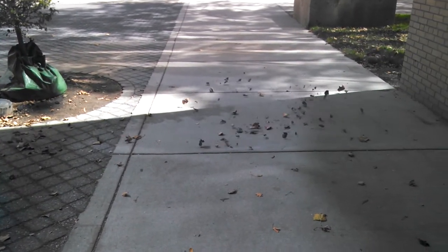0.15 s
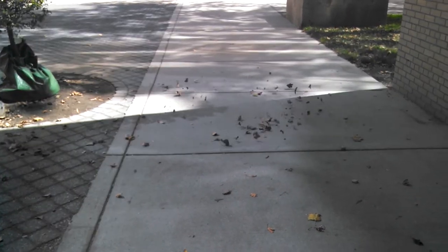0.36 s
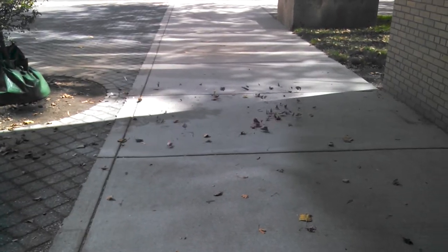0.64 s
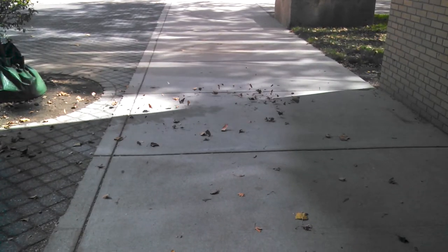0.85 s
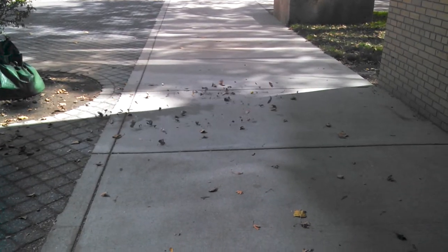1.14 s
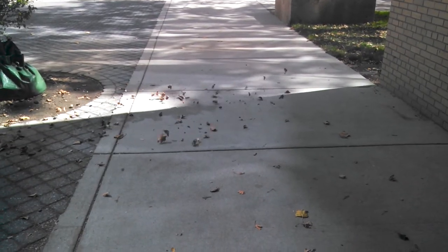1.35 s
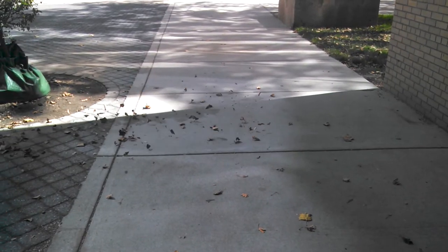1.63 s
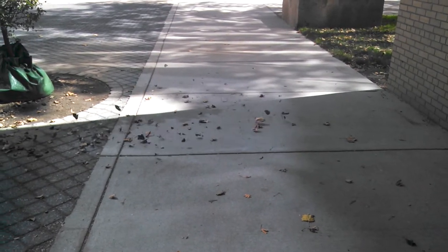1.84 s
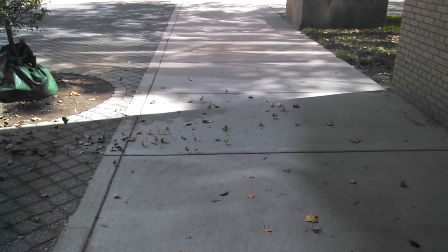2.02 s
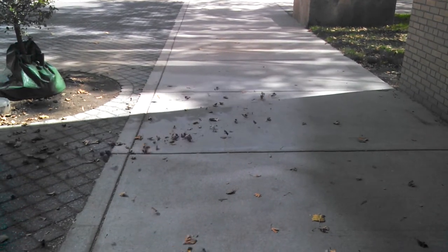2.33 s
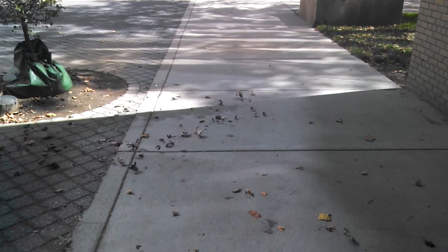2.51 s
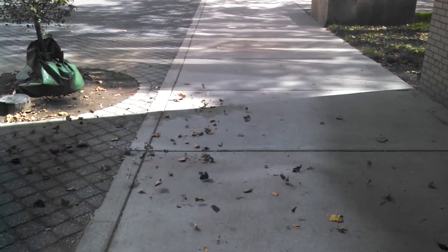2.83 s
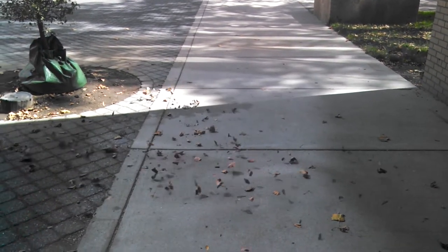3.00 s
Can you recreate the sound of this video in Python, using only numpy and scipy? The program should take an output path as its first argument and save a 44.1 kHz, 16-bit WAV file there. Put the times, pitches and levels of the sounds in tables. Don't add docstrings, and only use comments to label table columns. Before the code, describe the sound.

A swarm of dry leaves scrapes and taps across concrete outdoors, close to a small stereo camera microphone; low wind buffets grow strong around two seconds and return near the end, over distant murmur and humming fans.

```python
import sys
import numpy as np
from scipy import signal
from scipy.fft import rfft, irfft
from scipy.io import wavfile
from scipy.ndimage import uniform_filter1d

SR = 44100
rng = np.random.default_rng(int(sys.argv[2]) if len(sys.argv) > 2 else 0)


def ratio_of_db(decibels):
    return 10 ** (np.asarray(decibels, float) / 20)


def wav_out(sig):
    wavfile.write(sys.argv[1], SR, np.round(np.clip(np.atleast_2d(sig).T, -1, 1) * 32767).astype(np.int16))


N = 139797

# pitch_hz, level_db (per Hz)
LEAF_SPECTRUM = [(900, -15.5), (2000, 0), (3000, -1), (4400, -1), (6500, -3), (8500, -6.5), (9800, -17.5),
                 (12000, -14)]


def table(rows, at):
    rows = np.array(rows, float)
    return np.interp(np.log(np.maximum(at, 1)), np.log(rows[:, 0]), rows[:, 1])


def curve(rows, t):
    times, levels = np.transpose(rows)
    return np.interp(t, times, levels)


def unit(x):
    return x / np.sqrt(np.mean(x ** 2))


def colour(x, rows):
    return irfft(rfft(x) * ratio_of_db(table(rows, np.fft.rfftfreq(N, 1 / SR))), N)


def band(x, hz, width, order=1):
    half = width / hz / 2
    edge = hz * (np.sqrt(1 + half ** 2) + np.array([-1, 1]) * half)
    sos = signal.butter(order, np.minimum(edge, SR / 2.2), "band", fs=SR, output="sos")
    return signal.sosfilt(sos, x)


def walk(rate):
    k = int(SR / rate)
    steps = np.repeat(rng.standard_normal(N // k + 1), k)
    return 0.88 * uniform_filter1d(uniform_filter1d(steps, k), k)[:N]


def far_port(db):
    return ratio_of_db(np.array([[0], [db]]))


def ports(pair):
    return np.array([pair[0] + pair[1], pair[0] - pair[1]]) / 2


def town_murmur():
    # pitch_hz, level_db (per Hz)
    murmur = [(40, -9.5), (100, 1.5), (300, 1), (520, -11.5), (950, -14), (1500, -25), (3000, -34.5),
              (9000, -54)]
    # pitch_hz, difference_over_sum_db
    apart = [(60, 9), (200, -26), (400, -8), (700, -6.5), (1100, 3), (1600, 3.5)]
    pair = colour(rng.standard_normal((2, N)), murmur)
    pair[1] = colour(pair[1], apart)
    pair = pair / np.std(pair[0])
    swell, out = walk(4.8), 0
    for hz in 40 * 2 ** np.arange(0, 8, 1 / 2):
        flicker_db = 0.6 * swell + 2.9 * walk(11.93)
        out = out + ratio_of_db(flicker_db) * band(pair, hz, hz / 3)
    return ports(out * ratio_of_db(-20.5))


def fan_plant(t):
    # pitch_hz, width_hz, level_db
    partials = [(297.6, 5.14, -19), (361.2, 12.7, -29), (596.7, 12, -31.5), (640, 34, -35.5),
                (887.5, 15, -42.5), (995, 136, -36)]
    # time_s, level_db
    carry = [(0, 3.5), (.11, 1.5), (.15, -2), (.2, 0), (.43, -1.5), (.5, -5), (.56, -1), (.73, 0),
             (.94, -1), (1.16, -1), (1.3, -2.5), (1.45, -0.5), (1.69, -1), (2.0, 2.5), (2.24, -2.5),
             (2.42, 2.5), (2.75, 0.5), (3.17, -3)]
    out = 0
    for hz, width, db in partials:
        tone = band(rng.standard_normal((2, N)), hz, width)
        power = uniform_filter1d(tone ** 2, SR // 10) + 0.06 * np.mean(tone ** 2)
        sum_and_difference = ratio_of_db(np.array([[db], [db - 15.5]]))
        out = out + sum_and_difference * unit(tone / power ** 0.69)
    return ports(out * ratio_of_db(curve(carry, t)))


def eddies(hz, width, hold_s):
    x = band(rng.standard_normal((2, N)), hz, width, order=3)
    return x / np.sqrt(uniform_filter1d(x ** 2, int(hold_s * SR)) + 0.068 * np.mean(x ** 2))


def wind(t):
    # time_s, level_db
    gust = [(0, -38), (.1, -44), (1.0, -38), (1.3, -35.5), (1.5, -35), (1.74, -15), (1.88, -29),
            (1.93, -11), (2.04, -13), (2.14, -21.5), (2.22, -27.5), (2.36, -50), (2.45, -23.5), (2.54, -36),
            (2.74, -21.5), (2.82, -16.5), (2.97, -37), (3.17, -26.5)]
    # peak_s, level_db, length_s, edge_share_db
    buffets = [(0.085, -19, 0.021, -13), (0.142, -21, 0.04, -26), (0.197, -24, 0.037, -27),
               (0.568, -24, 0.023, -17), (0.732, -16.5, 0.036, -24), (0.85, -32, 0.095, -11),
               (0.96, -28, 0.06, -10), (1.206, -7.5, 0.017, -1.5), (1.386, -10.5, 0.043, -23),
               (1.45, -28, 0.041, -16), (1.563, -17.5, 0.029, -10), (1.665, -14.5, 0.026, -9),
               (1.778, -17.5, 0.03, -3), (1.811, -6.5, 0.032, -24), (1.939, -13, 0.034, 0),
               (2.077, -10.5, 0.023, -1.5), (2.161, -13.5, 0.042, -8), (2.277, -25, 0.06, -25),
               (2.468, -22, 0.056, -18), (2.61, -17, 0.071, -10), (2.685, -17, 0.02, -20),
               (2.783, -8, 0.024, -6), (2.873, -29, 0.031, -33), (2.915, -19.5, 0.043, -30.5),
               (3.007, -18.5, 0.031, -5.5), (3.04, -19, 0.042, -27), (3.088, -16.5, 0.027, -36),
               (3.113, -15, 0.022, -5)]
    # peak_s, peak_db, swing_hz, length_s
    eddy_slaps = [(.02, -24, 80, 0.037), (.49, -22, 75, 0.023), (1.068, -29, 80, 0.036),
                  (1.1, -29, 190, 0.026), (1.662, -19, 297, .03), (1.818, -8, 150, 0.013),
                  (2.068, -18, 150, 0.017), (.668, -22, 330, 0.0092), (1.946, -23, 170, 0.015),
                  (1.954, -23, 420, .012), (2.079, -13.5, 260, .01), (2.177, -22, 265, 0.021),
                  (2.185, -15, 60, 0.075), (2.773, -12, 303, .02), (2.809, -16.5, 335, 0.021),
                  (2.946, -19, 80, .04)]
    slow = ratio_of_db(curve(gust, t) + 0.79 * walk(24.1)) ** 2
    edge = slow * ratio_of_db(-19) ** 2
    for at, db, length, edge_db in buffets:
        puff = ratio_of_db(db) ** 2 * np.exp(-(2.67 * (t - at) / length) ** 2)
        slow = slow + puff
        edge = edge + puff * ratio_of_db(edge_db) ** 2
    rumble = np.sqrt(slow) * eddies(77, 127.6, 0.0124)
    sharp = np.sqrt(edge) * eddies(236, 289.0, 0.0104)
    slaps = 0
    for at, db, hz, length in eddy_slaps:
        swell = ratio_of_db(db) * np.exp(-(2 * (t - at) / length) ** 2)
        slaps = slaps + swell * np.sin(2 * np.pi * hz * (t - at))
    return rumble * far_port(-5) + (slaps + sharp) * far_port(-20)


def grains(per_s, scatter_db):
    hit = rng.random((2, N)) < per_s / SR
    return hit * rng.standard_normal((2, N)) * ratio_of_db(scatter_db * rng.exponential(size=(2, N)))


def leaf_swarm(t):
    # time_s, level_db
    thickness = [(0, -5.5), (.1, -1), (.4, -2.5), (.6, -0.5), (.8, -3), (1.05, -3), (1.3, -1.5), (1.6, -3),
                 (1.85, -3.5), (2.0, 1), (2.2, -3), (2.35, 0.5), (2.5, -2), (2.65, 1.5), (2.77, 1),
                 (2.9, 0.5), (3.08, 0), (3.17, 2.5)]
    flurry, out = 1.47 * walk(40) + 1.2 * walk(150), 0
    for hz in (1700, 3000, 4400, 6500, 9500, 13500):
        pace_db = flurry + 1.43 * walk(25.9) + 3.3 * walk(90)
        out = out + band(ratio_of_db(pace_db) * grains(4600, 2.16), hz, hz / 2)
    return ratio_of_db(-32 + curve(thickness, t)) * unit(colour(out, LEAF_SPECTRUM))


def leaf_strikes(t):
    # start_s, peak_db, ring_hz, length_s
    strikes = [(0.046, -17, 5000, 0.0083), (0.0603, -16, 6640, 0.011), (0.106, -24, 4900, 0.011),
               (0.169, -20, 4500, 0.007), (0.294, -17, 6400, 0.013), (0.4174, -25.5, 4360, 0.087),
               (0.598, -22, 6330, 0.012), (0.742, -31, 4100, 0.012), (0.8097, -16.5, 4500, 0.023),
               (0.841, -17, 4100, 0.013), (0.9385, -20, 6850, 0.0098), (0.964, -22, 4000, 0.01),
               (1.027, -16.5, 3690, 0.0094), (1.048, -16, 5440, 0.014), (1.0995, -18.5, 4070, 0.0085),
               (1.173, -39, 3260, 0.012), (1.18, -16.5, 4360, 0.012), (1.489, -26.5, 4330, 0.041),
               (1.619, -23.5, 4500, 0.017), (1.656, -19, 5700, 0.013), (1.772, -20, 4360, 0.017),
               (1.875, -26, 4320, 0.028), (1.918, -24.5, 6650, 0.014), (2.0345, -20.5, 5900, 0.019),
               (2.109, -27, 3420, 0.012), (2.273, -20.5, 4940, 0.0082), (2.367, -27, 3930, 0.0037),
               (2.3843, -11, 4600, 0.0039), (2.603, -20, 3900, 0.011), (2.871, -31, 3600, 0.058)]
    # start_s, peak_db, ring_hz, length_s
    more_taps = [(0.153, -20, 6240, 0.0057), (0.185, -20, 6900, .003), (0.256, -26, 4040, 0.0067),
                 (1.011, -20, 7170, 0.0055), (1.243, -30, 4350, 0.0063), (1.279, -33, 4180, .004),
                 (1.283, -27, 4400, .004), (1.37, -32, 4380, 0.0042), (1.4, -39, 4030, 0.0046),
                 (1.461, -26, 3950, 0.0044), (1.554, -30, 4210, .005), (1.721, -20.5, 2070, .006),
                 (1.973, -33, 4150, .004), (1.999, -28, 4090, .004), (2.153, -32, 4460, .006),
                 (2.288, -33, 6540, .006), (2.344, -35, 4100, .003), (2.391, -19, 3460, 0.015),
                 (2.4225, -26, 6300, 0.0044), (2.586, -27, 4160, 0.0046), (2.729, -26, 3760, .005),
                 (2.755, -24, 3880, 0.0091), (2.808, -25.5, 4350, .004), (2.964, -39, 4060, .004),
                 (3.068, -28, 3860, 0.0049), (3.139, -35, 4100, .005), (0.679, -24, 6800, 0.0048),
                 (.888, -38, 6700, .006), (1.069, -18.5, 6940, 0.0049)]
    # start_s, peak_db, ring_hz, length_s
    thin_snaps = [(.109, -19, 12500, 0.0025), (.487, -17.5, 7300, 0.0034), (1.166, -19, 7000, 0.0018),
                  (1.198, -18, 4700, 0.0067), (1.762, -30, 9500, 0.0042), (1.876, -35, 9300, 0.0018),
                  (1.937, -20, 4530, 0.0011), (2.3846, -18, 9400, 0.0016), (2.626, -29, 12500, 0.0018),
                  (2.27, -32, 12300, 0.0021), (2.775, -22.5, 4160, 0.01)]
    rise_s, crack_s, crack_db, ring_db = 0.002, 0.0008, 5, -4
    crackle = unit(colour(grains(14000, 0.48), LEAF_SPECTRUM))
    crackle = crackle / np.sqrt(uniform_filter1d(crackle ** 2, SR // 500) + 0.02)
    dull = signal.sosfilt(signal.butter(2, 10300, fs=SR, output="sos"), crackle)
    out = np.zeros((2, N))
    for events, rattle in ((strikes, dull), (more_taps, dull), (thin_snaps, crackle)):
        for at, db, hz, length in events:
            i = slice(int(at * SR), int(at * SR) + 4000)
            age = np.maximum(t[i] - at, 0)
            body = np.exp(-(age / max(length, 1e-3)) ** 2) * np.minimum(age / rise_s, 1)
            burst = rattle[:, i] * (body + ratio_of_db(crack_db) * np.exp(-age / crack_s))
            ring = ratio_of_db(ring_db - table(LEAF_SPECTRUM, hz) / 2) * 3 * band(burst, hz, hz / 10.3)
            out[:, i] += ratio_of_db(db - 12) * (burst + ring)
    return out


def gain_control(t):
    # time_s, depth_db
    ducks = [
        (0, -2.5),
        (.755, -4.5),
        (1.211, -9),
        (1.825, -5.5),
        (1.95, -2),
        (2.088, -2.5),
        (2.789, -6.5),
    ]
    climb_db_s, duck_s = 7.5, 0.0022
    db = climb_db_s * t
    for at, depth_db in ducks:
        db = db + depth_db * np.clip((t - at) / duck_s + 1, 0, 1)
    return ratio_of_db(db)


def scene():
    t = np.arange(N) / SR
    far = far_port(-5)
    steady = town_murmur() + fan_plant(t) + far * leaf_swarm(t)
    return steady * gain_control(t) + wind(t) + far * leaf_strikes(t)


def port_difference(x):
    return x - np.roll(x[::-1], 16, axis=1)


def low_pass(x):
    return signal.sosfilt(signal.butter(12, 15680, fs=SR, output="sos"), x)


def record(dry):
    out = port_difference(dry) * ratio_of_db(np.array([[-2.5], [0]]))
    hiss = ratio_of_db(-84) * rng.standard_normal((2, N)) * gain_control(np.arange(N) / SR)
    low_cut = signal.butter(3, 53, "high", fs=SR, output="sos")
    out = signal.sosfilt(low_cut, out + port_difference(hiss))
    top_cut = signal.ellip(4, 0.3, 13, 15600, fs=SR, output="sos")
    out = signal.sosfiltfilt(top_cut, 1.5 * np.tanh(out / 1.5))
    return low_pass(out)


dry = scene()
out = record(dry)
wav_out(out)
```